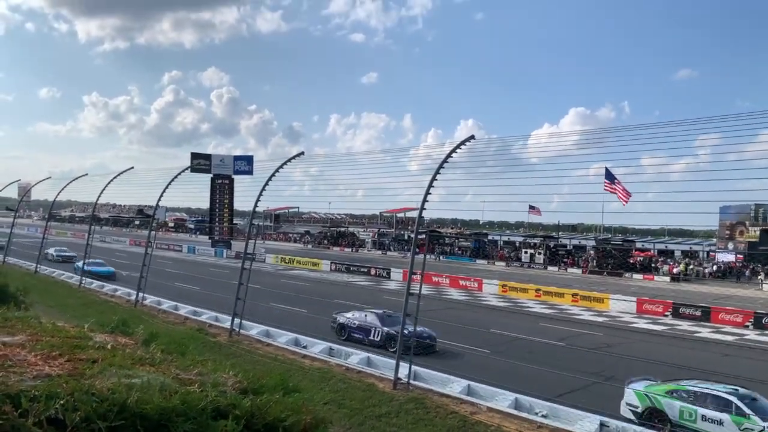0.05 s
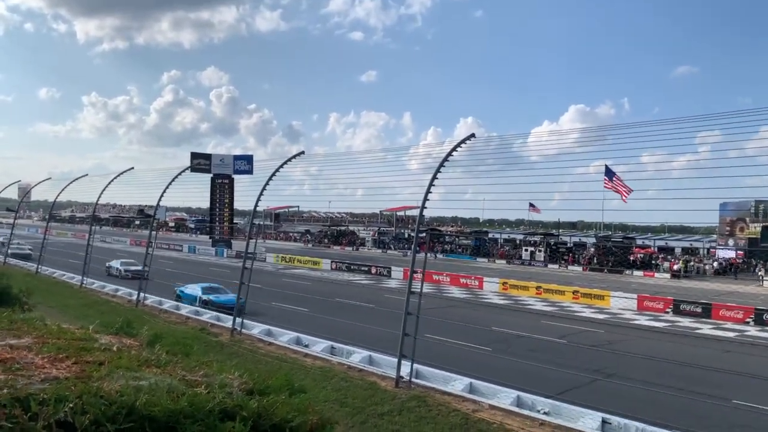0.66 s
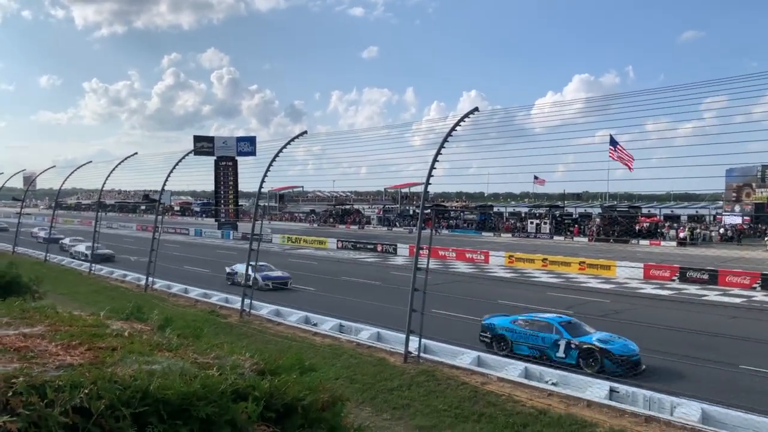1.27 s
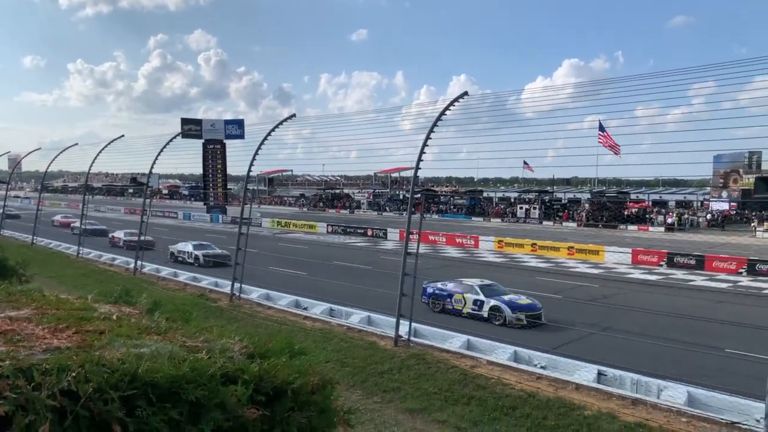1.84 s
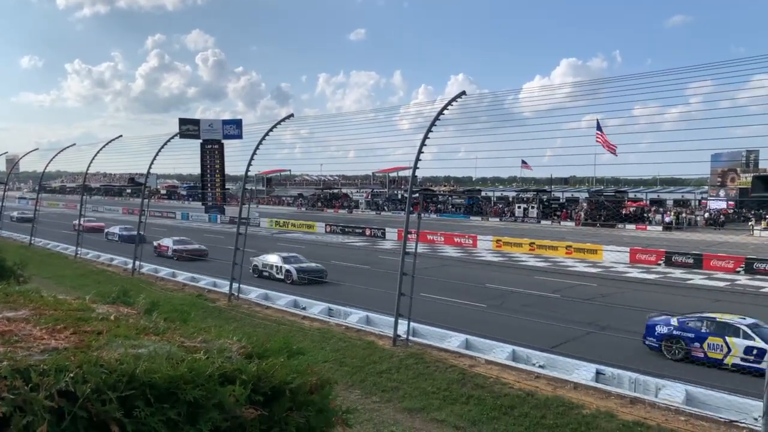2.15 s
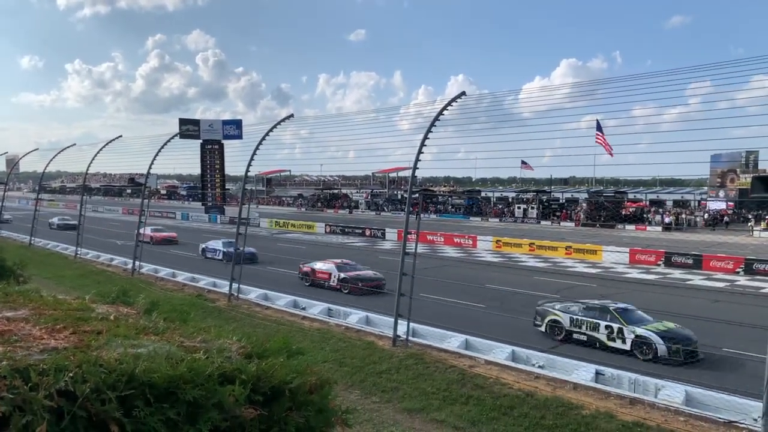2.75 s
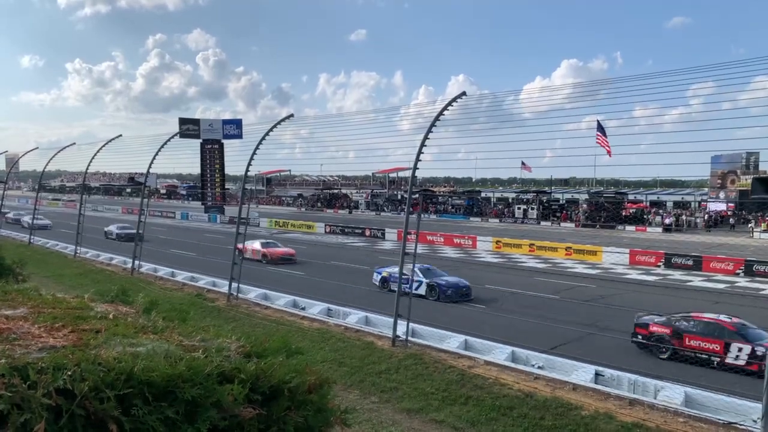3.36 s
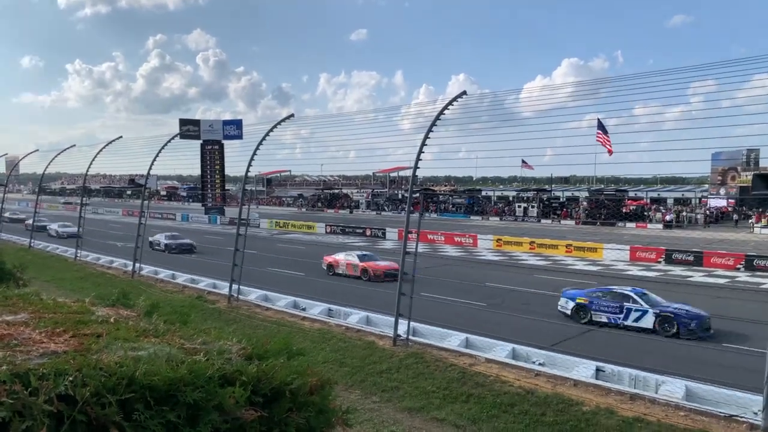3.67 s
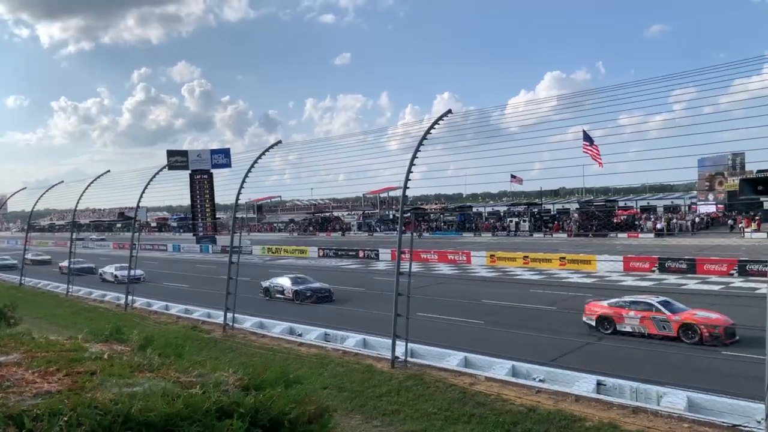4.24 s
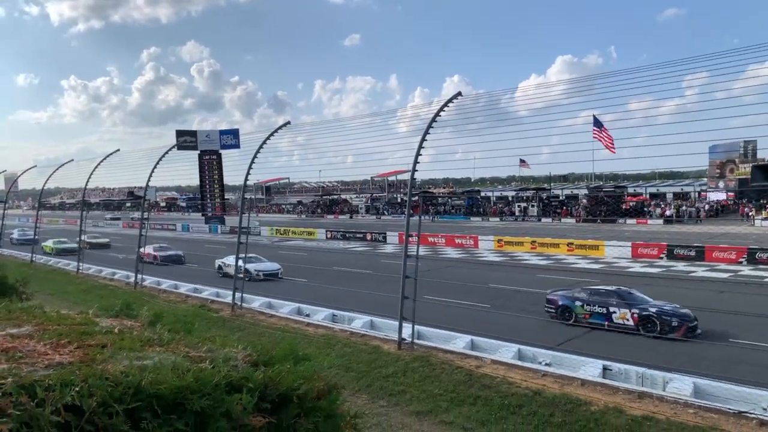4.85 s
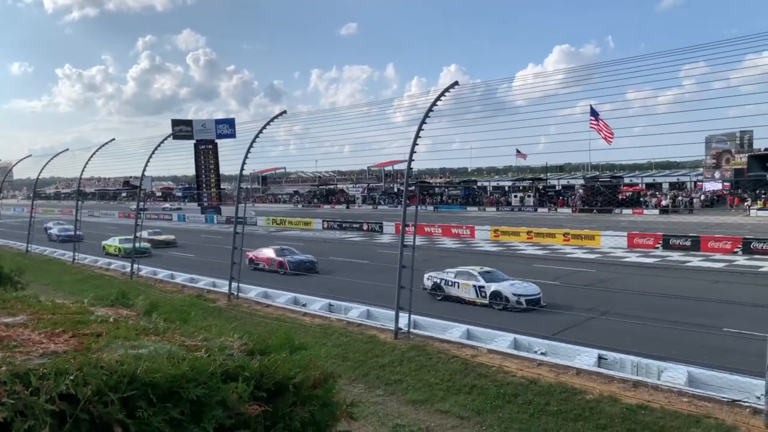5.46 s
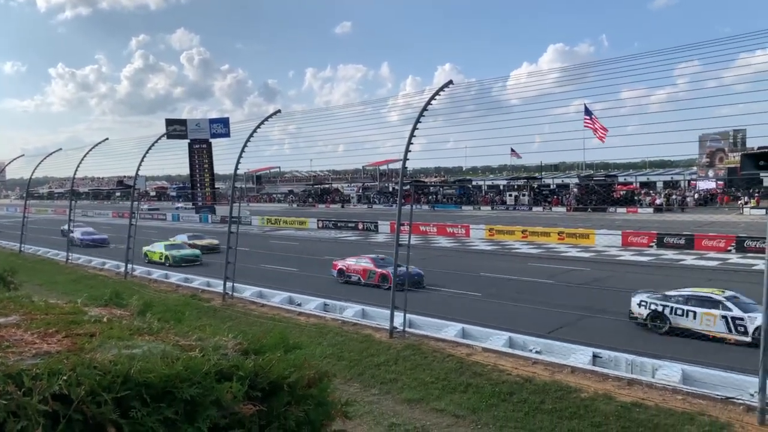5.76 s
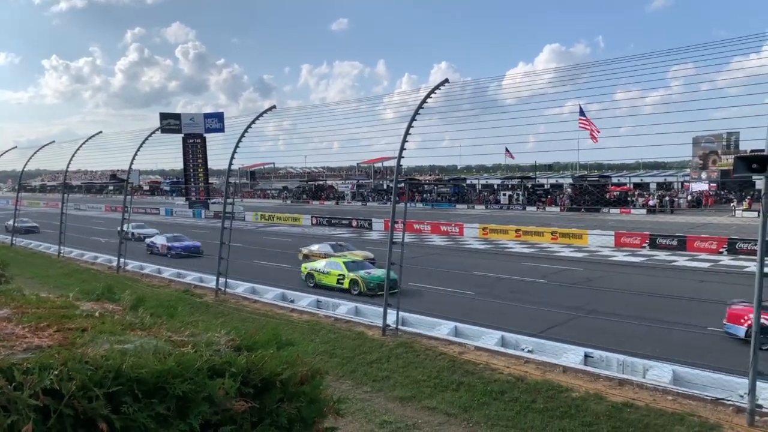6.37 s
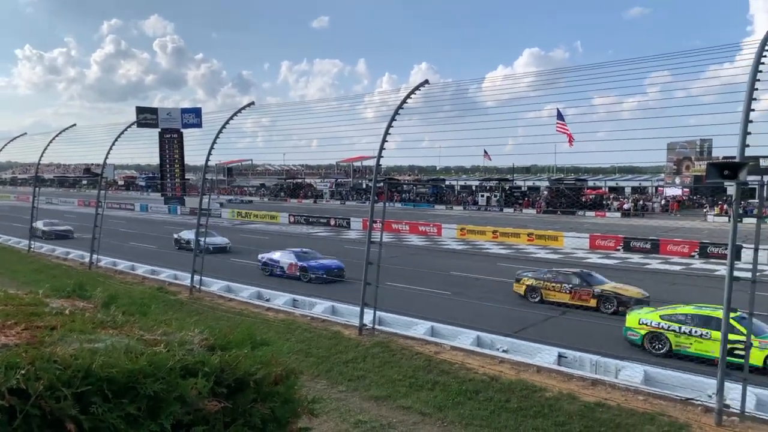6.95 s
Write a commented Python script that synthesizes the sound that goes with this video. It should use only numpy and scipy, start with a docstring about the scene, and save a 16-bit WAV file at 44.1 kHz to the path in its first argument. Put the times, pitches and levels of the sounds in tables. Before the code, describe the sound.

V8 stock cars race past in a long file on a track straight, heard from just behind the fence. Each engine swells into a howl, snarls as it passes and sinks in pitch as it leaves, overlapping the next. The rest of the pack makes a steady, booming roar with a short echo off the wall and stands. The microphone crackles and snaps, more so toward the end.

```python
"""V8 stock cars run close past in a long file, down the straight of an oval; the microphone stands
behind the catch fence. Each engine howls as it nears, barks as it passes and booms as it leaves,
its exhaust beam sweeping by and Doppler sinking its pitch all the way. Farther off, the pack blurs
into one roar that the wall and stands scatter sideways. The microphone crackles and snaps under
the heaviest pressure swings."""
import sys
import numpy as np
from scipy import signal
from scipy.fft import rfft, irfft, next_fast_len
from scipy.io import wavfile
from scipy.ndimage import uniform_filter1d

SR = 44100
rng = np.random.default_rng(int(sys.argv[2]) if len(sys.argv) > 2 else 0)


def wav_record(signal):
    """Record a signal, one row per channel, as 16-bit PCM in the file named by sys.argv[1]."""
    frames = np.transpose(np.atleast_2d(signal))
    bounded = np.clip(frames, -1, 1)
    # unit amplitude maps onto the largest positive 16-bit level
    quanta = np.round(bounded * 32767).astype(np.int16)
    wavfile.write(sys.argv[1], SR, quanta)


N = 313551
T = np.arange(N) / SR
HZ = np.fft.rfftfreq(N, 1 / SR)
CYLINDERS = 8

# when each car of the pack draws level with the microphone: abreast_s
PACK_ABREAST = [0.52, -0.16, 0.4, 2, 3, 3.5, 4, 4.5, 4.5, 5.5, 6.5, 6.5, 7]
# colour of the roar before its bands are levelled: frequency_hz, gain_db
PACK_COLOUR = [(20, -9.5), (45, -3.5), (54, -10), (63, 4.5), (74, 8), (110, 8), (140, 6), (190, 0),
               (290, 1), (390, -8), (470, -3), (560, -3), (700, -8.5), (850, -12), (1130, -7.5),
               (1280, -14.5), (1450, -24), (2100, -21.5), (3800, -51.5)]
# borders between the roar's six bands: edge_hz
PACK_EDGES = [105, 190, 400, 800, 1450]
# the roar's four lower bands: time_s, throb_db, boom_db, bark_db, rasp_db
PACK_LOW = [(0.0, -27, -18, -22.5, -26), (0.45, -21, -24.5, -22.5, -28.0), (0.9, -30.5, -20.5, -19, -26.5),
            (1.3, -26, -24.5, -23, -25.5), (1.8, -24, -21, -20.5, -28.5), (2.25, -26, -24.5, -25, -27),
            (2.65, -25, -21.5, -19.5, -24.5), (3.2, -28.5, -27, -23.5, -26.5),
            (3.8, -19, -20.0, -21.5, -27.5), (4.5, -27.5, -20, -21.5, -25.5), (5.3, -25, -22, -23.5, -26.5),
            (5.85, -22.5, -21.0, -24.5, -26.0), (6.4, -21.5, -21, -21.5, -26),
            (7.1, -21, -20.5, -20, -23.5)]
# its two upper bands: time_s, snarl_db, rush_db
PACK_TREBLE = [(0, -34.5, -49.5), (.9, -38.5, -48), (1.8, -34.5, -46.5), (2.7, -33.5, -47),
               (3.6, -36.5, -46.5), (4.7, -33.5, -37.5), (5.15, -33, -43.5), (5.4, -32, -37.5),
               (5.9, -30.5, -42.5), (6.65, -34, -43), (7.1, -25, -41.5)]

# sound off the wall and stands, against the direct sound: frequency_hz, side_gain_db
SCATTER_WIDTH = [(30, -16), (60, -15), (125, -25), (260, -10.5), (550, -6), (1100, -4), (1800, 6),
                 (2600, -16), (4000, 1)]
# how far the microphone's left port lags the right: frequency_hz, lag_rad
LEFT_LAG = [(30, .05), (125, 0.18), (260, 0.53), (550, 0.73), (780, 1), (1120, .3), (2000, .3)]

# ring of the microphone ports: frequency_hz, gain_db
PORT_COLOUR = [(1000, -48), (2400, -0.5), (3500, -3), (4400, 6), (5400, 2), (6300, -0.5), (7600, 2),
               (8700, 1.5), (9800, 2), (11500, -6)]
# how alike the two ports ring, negative for opposed: frequency_hz, likeness
PORT_LIKENESS = [(2000, 0.24), (4300, -0.05), (5200, -0.02), (6500, 0.72), (7500, -0.5), (8200, -1.05),
                 (9200, -0.97), (9900, -0.1), (10600, 3)]
# which way the ring leans: frequency_hz, left_minus_right_db
PORT_BALANCE = [(2500, 0.5), (4300, -2.5), (5200, -6), (6500, -0.5), (8000, 0)]
# borders between the crackle's four bands: edge_hz
CRACKLE_EDGES = [3800, 5500, 7800]
# crackle grows as the field thickens: time_s, rattle_db, grit_db, fizz_db, sizzle_db
CRACKLE_BED = [(0, -47, -48, -52, -48.5), (1.9, -43, -46, -53, -48.5), (2.7, -40.5, -43.5, -44.5, -41),
               (3.8, -46.5, -44, -47, -44), (5, -42, -43.5, -41, -39), (7.1, -39.5, -34.5, -38, -29.5)]
# rises and dips added to that bed: centre_s, half_width_s, rattle_db, grit_db, fizz_db, sizzle_db
CRACKLE_SURGES = [(.8, 0.25, 6.5, 0, 5, 4.5), (1.517, 0.19, 0.5, -2, 8, 3), (2.36, 0.19, -6, 8, 0, 2.5),
                  (2.883, 0.082, 0, 0.5, 6, 6), (3.093, 0.15, 2, 11, 2, 7.5),
                  (4.717, 0.11, 1.5, 5.5, 4, 1.5), (5.16, 0.17, -3, 10, 5, 2),
                  (5.373, 0.092, 4.5, 2.5, 4.5, 1), (5.923, 0.061, -6, 9, 3, 1),
                  (6.208, 0.11, 4, 4.5, 5, 4), (6.384, 0.14, -3, -5, -3.5, -2.5),
                  (6.603, 0.13, -1, 4, 3, -2.5), (6.909, 0.073, 6.5, -5, 4, -3)]
# hardest blows on the microphone: start_s, relative_level_db, left_minus_right_db
SNAPS = [(0.714, -8, -2), (0.751, -7.5, -4), (0.861, -7, 1), (0.937, -13, 0), (1.012, -13, 0),
         (1.5034, -14, -10), (1.5393, -12, -4), (2.029, -19, 0), (2.408, -16, -2), (2.846, -6, -3),
         (3.0286, -11, -3), (3.156, -7, -4), (3.361, -12, -5), (3.6806, -17, -17), (4.091, -12, 0),
         (4.6592, -6.5, -4), (4.747, -3, 2), (5.018, -1.5, -2), (5.0767, -6, -9), (5.107, -4, -3),
         (5.146, -9, -8), (5.294, -10, -12), (5.398, -6.5, 7), (5.8787, -10, -5), (6.0062, -10.5, -16),
         (6.218, -2, -2), (6.338, -10, 5), (6.457, -3, -9), (6.5373, -9, -10), (6.7195, 2, 5),
         (6.925, -7, -5), (6.94, 2.5, 1)]

# cars nearest the fence, numbered from 1:
# abreast_s, cycle_hz, mach, glide_s, snarl_loudest_s, snarl_half_width_s, snarl_db
NEAR_CARS = [(-.139, 30.2, .193, .56, .49, 1, -39), (1.46, 28.02, .082, .551, 1.8, .91, -37),
             (2.5, 31.3, .071, .57, 2.2, 0.75, -32.5), (2.5, 27.95, .066, .718, 2.88, .5, -29),
             (3.5, 29.655, .06, .583, 3.37, .6, -35), (3.5, 28.06, .204, 1.62, 4.3, .75, -31),
             (5.5, 32.35, .061, .723, 5.04, 0.41, -31), (6, 30.92, .065, .87, 5.94, .51, -32.5),
             (7.5, 29.9, .073, .646, 6.63, 0.76, -36), (5, 28.23, .129, .825, 5, 0.43, -34.5)]
# colour of a near engine's snarl: frequency_hz, gain_db
SNARL_COLOUR = [(380, -6), (480, 4), (590, -1), (700, -4.5), (860, -16.5), (1000, -8), (1130, -2.5),
                (1280, -6), (1450, -19.5), (2100, -33.5), (2600, -28)]
# exhaust notes beamed past the microphone: car_number, cycle_multiple, loudest_s, half_width_s, base_db
EXHAUST_NOTES = [(1, 3, 0.2, 0.15, -17.5), (1, 3, 0.7, 0.9, -24.0), (1, 5, 1.45, 0.9, -21.5),
                 (2, 3, 0.25, 0.45, -22.0), (2, 3, 1.65, 0.9, -22.0), (2, 3, 3.0, 0.9, -23.0),
                 (2, 3, 3.5, 0.15, -19.5), (2, 5, 0.6, 0.15, -19.5), (2, 5, 1.25, 0.15, -22.5),
                 (2, 5, 3.2, 0.9, -21.0), (2, 14, 1.15, 0.15, -31.0), (2, 21, 1.1, 0.65, -35.5),
                 (3, 3, 2.45, 0.9, -26.5), (3, 5, 1.9, 0.9, -28.0), (3, 7, 3.25, 0.9, -30.0),
                 (3, 8, 2.4, 0.32, -22.5), (3, 9, 2.65, 0.9, -28.5), (3, 10, 0.95, 0.45, -23.5),
                 (3, 11, 2.6, 0.32, -27.0), (3, 14, 3.05, 0.15, -32.0), (3, 15, 1.8, 0.9, -35.0),
                 (3, 16, 1.6, 0.65, -27.5), (3, 17, 1.85, 0.32, -28.0), (3, 19, 1.9, 0.45, -33.0),
                 (3, 20, 1.35, 0.22, -35.5), (3, 23, 2.1, 0.15, -37.5), (4, 3, 2.0, 0.15, -22.5),
                 (4, 3, 3.0, 0.15, -19.5), (4, 5, 2.85, 0.45, -23.0), (4, 7, 1.2, 0.45, -24.5),
                 (4, 8, 2.95, 0.32, -26.5), (4, 9, 1.0, 0.9, -30.0), (4, 11, 1.1, 0.15, -26.5),
                 (4, 11, 3.2, 0.15, -21.5), (4, 16, 2.95, 0.22, -31.5), (4, 18, 2.0, 0.15, -27.5),
                 (4, 25, 3.25, 0.15, -34.5), (4, 26, 3.05, 0.22, -33.5), (5, 16, 3.0, 0.65, -28.0),
                 (5, 22, 3.75, 0.15, -32.5), (5, 23, 2.85, 0.15, -35.5), (6, 3, 4.4, 0.45, -23.0),
                 (6, 3, 5.45, 0.65, -21.0), (6, 15, 2.55, 0.15, -27.0), (7, 3, 4.85, 0.9, -21.0),
                 (7, 8, 4.95, 0.15, -19.0), (7, 9, 6.2, 0.9, -28.0), (7, 11, 5.6, 0.8, -25.5),
                 (7, 16, 4.5, 0.45, -25.0), (7, 18, 4.45, 0.15, -29.5), (7, 22, 5.0, 0.45, -38.0),
                 (7, 23, 4.15, 0.15, -36.0), (7, 24, 5.05, 0.22, -38.5), (7, 27, 4.7, 0.32, -37.0),
                 (7, 30, 4.6, 0.65, -39.5), (7, 32, 4.8, 0.22, -35.0), (7, 34, 4.95, 0.22, -36.5),
                 (7, 35, 5.0, 0.32, -36.0), (7, 38, 4.9, 0.45, -40.0), (8, 4, 6.65, 0.45, -17.0),
                 (8, 5, 5.35, 0.9, -24.5), (8, 8, 5.25, 0.22, -16.5), (8, 8, 5.95, 0.32, -21.5),
                 (8, 10, 5.35, 0.9, -27.5), (8, 11, 6.95, 0.22, -24.5), (8, 14, 5.9, 0.9, -36.0),
                 (8, 16, 5.5, 0.9, -33.5), (8, 17, 5.5, 0.45, -28.5), (8, 18, 5.4, 0.15, -25.5),
                 (8, 19, 5.5, 0.15, -30.0), (8, 19, 6.0, 0.22, -31.0), (8, 22, 5.9, 0.45, -33.0),
                 (9, 10, 6.85, 0.22, -24.5), (9, 15, 6.8, 0.22, -31.0), (10, 3, 6.15, 0.15, -18.5),
                 (10, 3, 6.9, 0.22, -19.0), (10, 5, 5.85, 0.22, -20.0), (10, 5, 6.55, 0.45, -15.5),
                 (10, 11, 4.55, 0.15, -25.0), (10, 12, 5.6, 0.15, -24.5), (10, 13, 5.5, 0.15, -23.0)]


def amp(db):
    """Decibels to gain."""
    return 10 ** (np.asarray(db) / 20)


def unit(x):
    """Scales to rms 1."""
    return x / np.sqrt(np.mean(x ** 2) + 1e-20)


def over_time(rows):
    """Each column of a curve table, sample by sample."""
    times_s, *columns = np.transpose(rows)
    return [np.interp(T, times_s, column) for column in columns]


def over_hz(points):
    """A short spectrum spread over all frequencies."""
    hz, value = np.transpose(points)
    return np.interp(np.log(HZ + 1), np.log(hz), value)


def shaped(x, gain):
    """Filters by a gain given at every frequency."""
    size = next_fast_len(N)
    gain = np.interp(np.fft.rfftfreq(size, 1 / SR), HZ, gain)
    return irfft(rfft(x, size) * gain, size)[..., :N]


def below(hz, order=16):
    """Gain of a low-pass that falls 3 dB an octave per order."""
    return 1 / np.sqrt(1 + (HZ / hz) ** order)


def banded(x, edges_hz, levels_db):
    """Splits a sound at the edges and gives each band its own level curve."""
    steps = [0 * HZ] + [below(hz, order=24) ** 2 for hz in edges_hz] + [1 + 0 * HZ]
    bands = np.diff(steps, axis=0)
    return sum(unit(shaped(x, band)) * amp(level_db) for band, level_db in zip(bands, levels_db))


def drift(rate_hz):
    """Slow random wandering of rms 1."""
    knots = rng.standard_normal(4096)
    return unit(np.interp(T * rate_hz, np.arange(len(knots)), knots))


def flicker(x, depth_db, bins, frames):
    """Shifts the colour in random patches, so many 86 Hz bins wide and 3 ms frames long."""
    spectra = signal.stft(x, nperseg=512, noverlap=384)[2]
    patches = uniform_filter1d(rng.standard_normal(spectra.shape[-2:]), bins, axis=0)
    patches = unit(uniform_filter1d(patches, frames, axis=1))
    patches *= np.minimum((np.arange(len(patches)) + 2) / 8, 1)[:, None]  # the bass holds steadier
    return signal.istft(spectra * amp(depth_db * patches), nperseg=512, noverlap=384)[1][..., :N]


def exhaust(multiples, levels_db, cycles, scatter, size=32768):
    """One engine cycle, repeated as the engine turns; less phase scatter makes a sharper pulse."""
    partials = np.zeros(size // 2 + 1, complex)
    partials[multiples] = amp(levels_db) * np.exp(2j * np.pi * scatter * rng.random(len(multiples)))
    one_cycle = irfft(partials) * size / np.sqrt(2)
    return one_cycle[(cycles * size).astype(int) % size]


def pack_car(abreast_s, cycle_hz=30, mach=.11, glide_s=.9, beaming=1.03):
    """Doppler drops a far car's pitch as its side pipes beam past; glide_s is distance over speed."""
    along = (T - abreast_s) / glide_s
    distance = np.sqrt(1 + along ** 2)  # 1 when abreast of the microphone
    heard_hz = cycle_hz * rng.uniform(0.96, 1.04) / (1 + mach * along / distance)
    heard_hz *= 1 + .0035 * drift(45)  # the turbulent wake smears the high partials
    multiples = np.arange(2, 96)
    levels_db = 3.3 * rng.standard_normal(len(multiples)).clip(-2, 2)
    return exhaust(multiples, levels_db, np.cumsum(heard_hz) / SR, scatter=0.99) / distance ** beaming


def pack_roar(rush_db=-7.0, rush_hz=2200):
    """Farther off, engines pass over the rush of tyres and air; gusts make the roar ragged."""
    engines = unit(sum(pack_car(abreast_s) for abreast_s in PACK_ABREAST))
    rush = unit(shaped(rng.standard_normal(N), below(rush_hz, order=2)))
    ragged = flicker(engines + amp(rush_db) * rush, depth_db=2.5, bins=4, frames=36)
    roar = shaped(ragged, amp(over_hz(PACK_COLOUR)) * below(5300))
    return banded(roar, PACK_EDGES, [*over_time(PACK_LOW), *over_time(PACK_TREBLE)])


def wall_and_stands(direct, t60_s=0.49, echoes=500):
    """Wall and stands scatter the sound sideways; the direct sound reaches the right port first."""
    delays = rng.integers(SR // 200, SR // 4, echoes)
    taps = np.zeros(SR // 4)
    taps[delays] = rng.choice([-1, 1], echoes) * amp(-60 * delays / SR / t60_s)
    scattered = signal.fftconvolve(direct, taps / np.linalg.norm(taps))[:N]
    lag_rad = over_hz(LEFT_LAG).clip(0, 2)
    side = shaped(scattered, amp(over_hz(SCATTER_WIDTH))) + shaped(direct, -1j * np.tan(lag_rad / 2))
    return np.array([direct + side, direct - side])


def microphone_ports(left, right):
    """Colours two buzzes as the ports ring, alike in some bands and opposed in others."""
    likeness = np.clip(over_hz(PORT_LIKENESS), -.99, .99)
    colour, balance = amp(over_hz(PORT_COLOUR)), amp(over_hz(PORT_BALANCE) / 2)
    mid, side = colour * np.sqrt((1 + likeness) / 2), colour * np.sqrt((1 - likeness) / 2)
    own, across = mid + side, mid - side
    left_port = shaped(left, own * balance) + shaped(right, across * balance)
    right_port = shaped(left, across / balance) + shaped(right, own / balance)
    return np.array([left_port, right_port]) / np.sqrt(2)


def microphone_crackle(pressure, base_per_s=430, trough_bias=0.79, size_db=6.0, ring_s=0.0015):
    """Millisecond buzzes, likelier in the deep troughs of the pressure wave, over a thin hiss."""
    chance = base_per_s / SR * np.exp(-trough_bias * unit(pressure))
    struck = rng.random((3, N)) < chance  # left port, right port, both
    sizes = struck * amp(size_db * np.minimum(rng.exponential(1, (3, N)), 4))
    decay = np.exp(-np.arange(SR // 100) / SR / ring_s)
    power = signal.oaconvolve(sizes ** 2, decay[None], axes=1)[:, :N].clip(0)
    power = (power[:2] + power[2]) / (2 * power.mean())
    bursts = shaped(np.sqrt(power) * rng.standard_normal((2, N)), 1 - below(2880, order=6))
    hiss = shaped(rng.standard_normal((2, N)), 0.54 + below(3600, order=6) / 2)  # fills the low end
    buzz = flicker(microphone_ports(*(bursts + hiss)), depth_db=3, bins=6, frames=7)
    surges_db = sum(np.outer(gains_db, np.exp(-((T - centre_s) / half_width_s) ** 2))
                    for centre_s, half_width_s, *gains_db in CRACKLE_SURGES)
    return banded(buzz, CRACKLE_EDGES, over_time(CRACKLE_BED) + surges_db)


def microphone_snaps(ring_s=0.0006, gain_db=-10.5, low_cut_hz=2600):
    """The hardest blows on the microphone: short bright bursts that ring its ports."""
    blows = np.zeros((2, N + SR))
    t = np.arange(SR // 100) / SR
    envelope = t / ring_s * np.exp(1 - t / ring_s)
    for start_s, level_db, pan_db in SNAPS:
        start = round(start_s * SR)
        gains = amp([[level_db + pan_db / 2], [level_db - pan_db / 2]])
        blows[:, start:start + len(t)] += gains * envelope * rng.standard_normal((2, len(t)))
    return amp(gain_db) * shaped(microphone_ports(*blows[:, :N]), 1 - below(low_cut_hz, order=6))


def beam(loudest_s, half_width_s):
    """Bell-shaped gain of an exhaust beam sweeping past the microphone."""
    return np.exp(-np.minimum(((T - loudest_s) / half_width_s) ** 2, 20))


def exhaust_note(cycles, multiple, loudest_s, half_width_s, base_db, trim_db=0.03, tilt_db=-0.3):
    """One partial swells and fades; turbulent air makes it flutter, and blurs the high ones."""
    octaves = np.log2(multiple / CYLINDERS)  # above the firing rate
    flutter_db = 1.65 * (1 + octaves / 2) * drift(16)
    gain = beam(loudest_s, half_width_s) * amp(base_db + trim_db + tilt_db * octaves + flutter_db)
    blur = 0.0068 * multiple * drift(22)
    return np.sqrt(2) * gain * np.cos(2 * np.pi * (round(multiple) * cycles + blur + rng.random()))


def near_car(number, car, wobble=0.00094, jitter_cycles=0.0029, flutter_db=4.0):
    """A V8 close to the fence: Doppler sinks its pitch as its notes swell over a pulsing snarl."""
    abreast_s, cycle_hz, mach, glide_s, loudest_s, half_width_s, snarl_db = car
    since_s = T - abreast_s
    heard_hz = cycle_hz / (1 + mach * since_s / np.hypot(since_s, glide_s))
    cycles = np.cumsum(heard_hz * (1 + wobble * drift(30))) / SR
    multiples = np.arange(12, 80)
    levels_db = np.interp(multiples * cycle_hz, *np.transpose(SNARL_COLOUR))
    levels_db += 4 * rng.standard_normal(len(multiples)).clip(-1.5, 1.5)  # each engine's own voice
    snarl = unit(exhaust(multiples, levels_db, cycles + jitter_cycles * drift(40), scatter=0.64))
    snarl *= beam(loudest_s, half_width_s) * amp(snarl_db + flutter_db * drift(14))
    notes = sum(exhaust_note(cycles, *note) for owner, *note in EXHAUST_NOTES if round(owner) == number)
    return snarl + notes


def scene():
    """The near cars and the pack, as they reach the catch fence."""
    near = sum(near_car(number, car) for number, car in enumerate(NEAR_CARS, 1))
    return wall_and_stands(near + pack_roar())


def record(dry, gain_db=0.22, ceiling=.95, top_hz=11780):
    """The microphone crackles, snaps and rounds off the highest peaks; the top treble is cut."""
    loud = amp(gain_db) * dry + microphone_crackle(dry.mean(0)) + microphone_snaps()
    rounded = loud / (1 + (loud / ceiling) ** 6) ** (1 / 6)
    low_pass = signal.firwin(201, top_hz, window=("kaiser", 9), fs=SR)
    return signal.oaconvolve(rounded, low_pass[None], "same")


dry = scene()
out = record(dry)
wav_record(out)
```